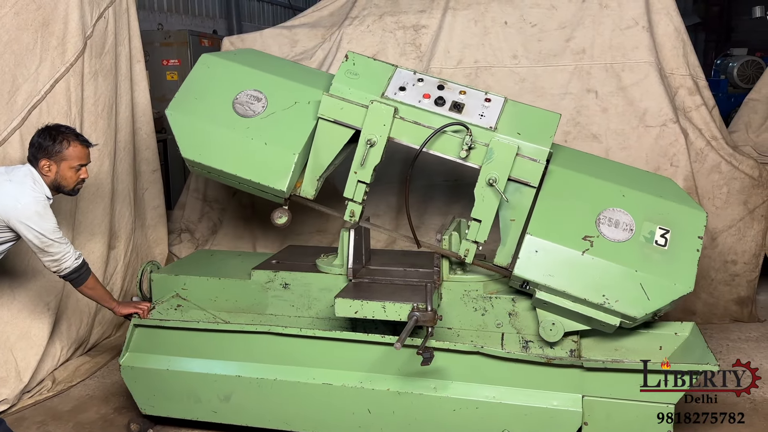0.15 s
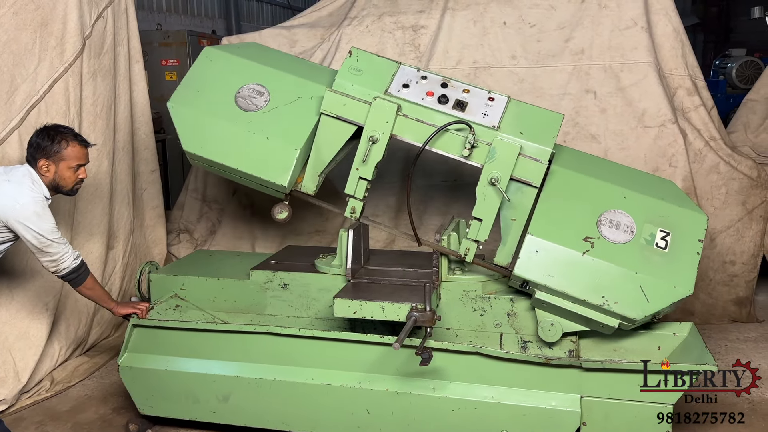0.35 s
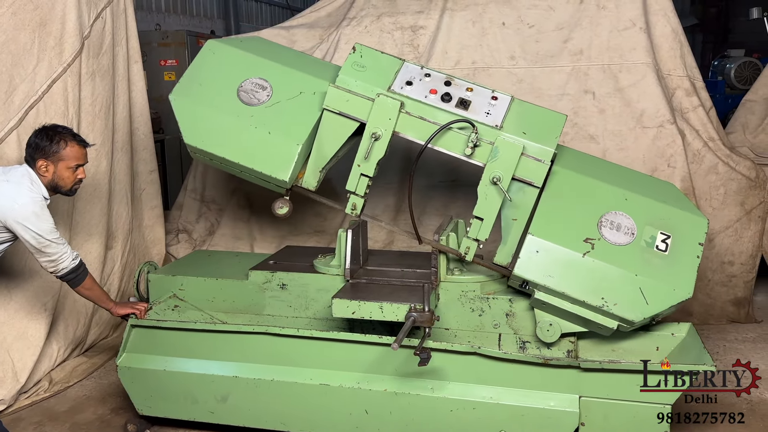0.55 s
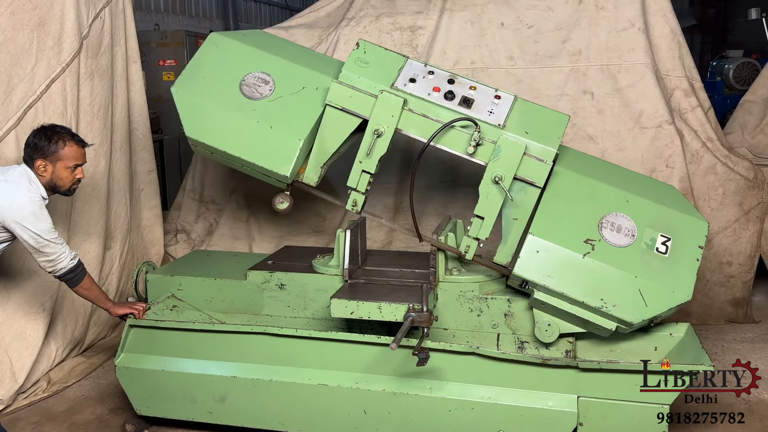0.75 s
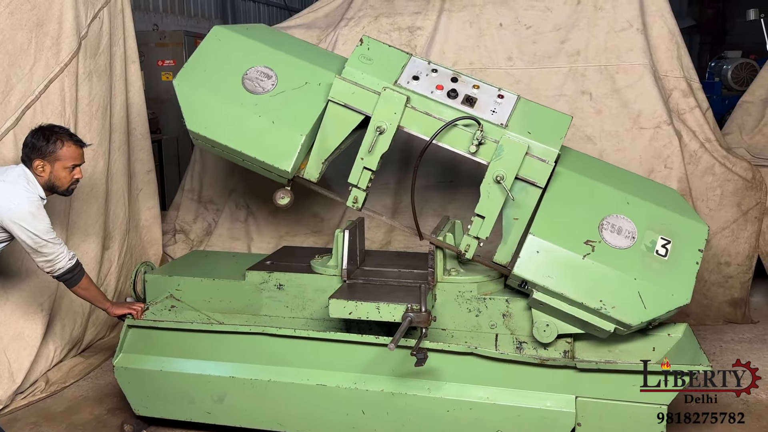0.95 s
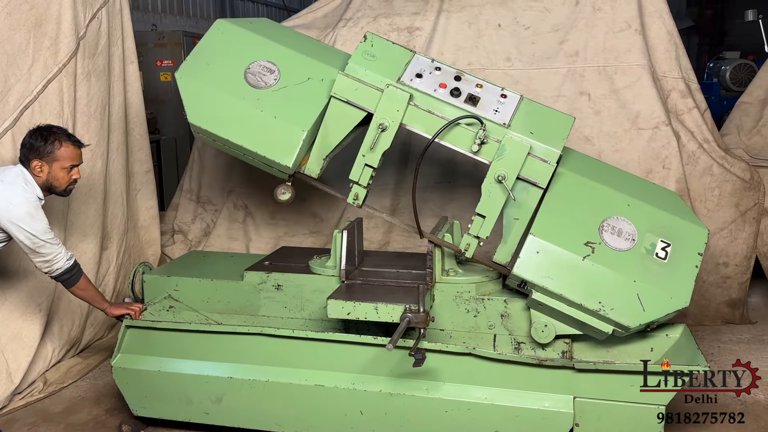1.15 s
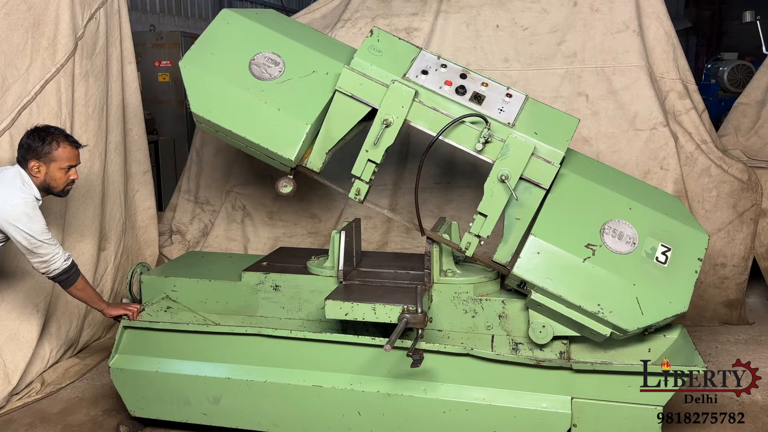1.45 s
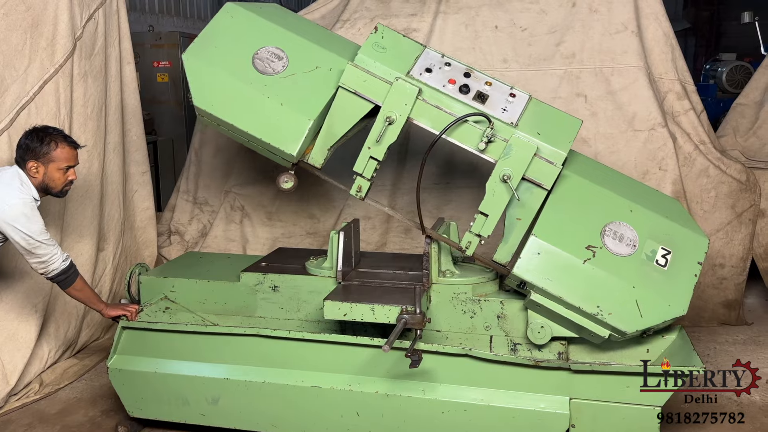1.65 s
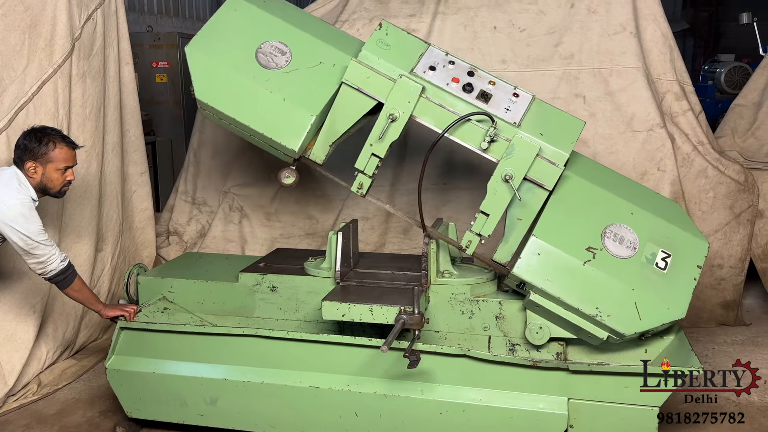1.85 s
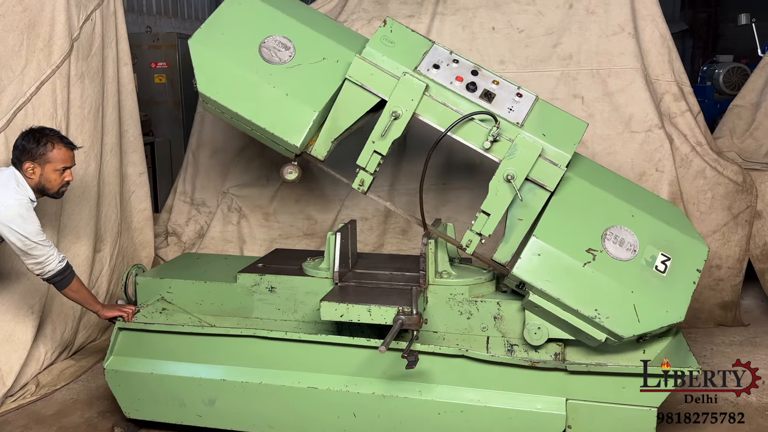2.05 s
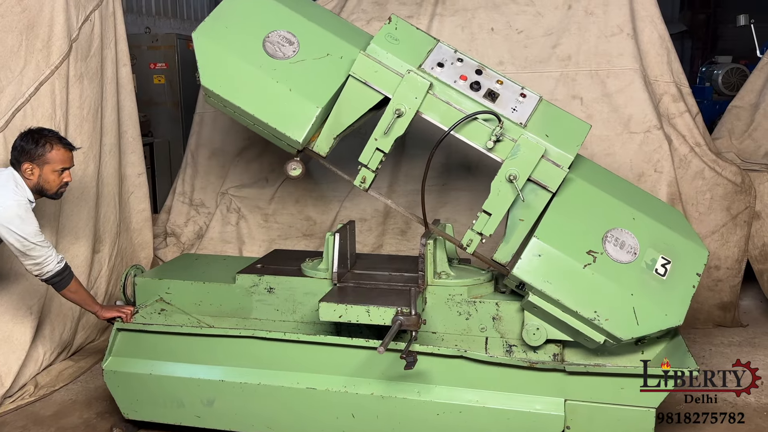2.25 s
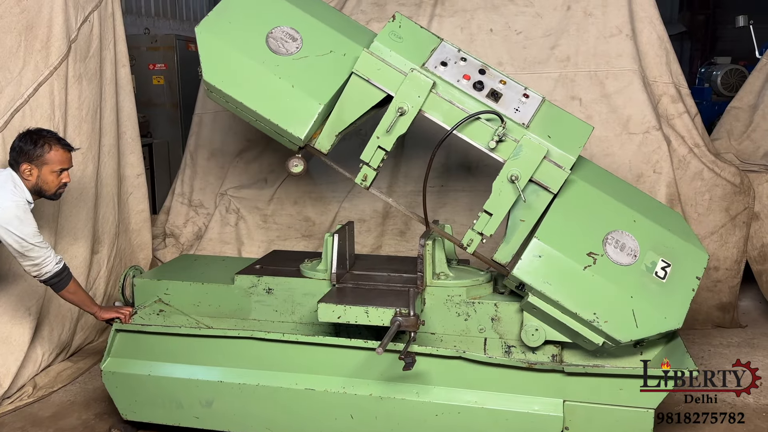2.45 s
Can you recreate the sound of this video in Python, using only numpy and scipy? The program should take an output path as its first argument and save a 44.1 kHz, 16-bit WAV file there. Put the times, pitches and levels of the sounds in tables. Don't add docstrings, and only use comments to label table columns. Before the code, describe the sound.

Steady low machine hum with slight wavering and airy hiss, heard in mono from nearby; after over two seconds a loud metallic switch clack and short thud, a reverberant slap, and the motor coasts down.

```python
import sys
import numpy as np
from scipy import signal
from scipy.fft import rfft, irfft
from scipy.io import wavfile
from scipy.ndimage import uniform_filter1d

SR = 44100
rng = np.random.default_rng(int(sys.argv[2]) if len(sys.argv) > 2 else 0)


def volts_from_db(level):
    exponent = np.asarray(level, float) / 20
    return 10 ** exponent


def output_pcm(signal):
    pcm = np.clip(np.atleast_2d(signal).T, -1, 1) * 32767
    wavfile.write(sys.argv[1], SR, np.round(pcm).astype(np.int16))


N = 114660
CUT_S = 2.297
CLACK_S, CLACK_DB = 2.286, -2


def evened(x):
    return x / np.sqrt(np.mean(x ** 2) + 1e-20)


def read(points, hz):
    f, value = np.transpose(points)
    return np.interp(np.log(hz + 1), np.log(f + 1), value)


def coloured(count, table, tilt_db=0):
    hz = np.fft.rfftfreq(count, 1 / SR)
    gain = volts_from_db(read(table, hz) + tilt_db * np.log2((hz + 50) / 2000))
    return evened(irfft(rfft(rng.standard_normal(count)) * gain, count))


def resonate(x, hz, width):
    turn = np.exp(2j * np.pi * np.cumsum(hz * np.ones(len(x))) / SR)
    r = np.exp(-np.pi * width / SR)
    return 2 * (turn * signal.lfilter([1 - r], [1, -r], x / turn + 1e-18)).real


def whistle(hz, width):
    once = resonate(rng.standard_normal(N), hz, width)
    return evened(resonate(once, hz, width))


def after_cut():
    return np.maximum(np.arange(N) / SR - CUT_S, 0)


# frequency in Hz, level in dB per Hz.
HISS = [(160, -47), (280, -5), (658, -7), (757, -7), (871, -7), (2840, -19), (4250, -30.5), (9400, -38.5),
        (10800, -48), (11400, -83.5), (12000, -64.5), (15000, -79), (22000, -120)]


def hiss():
    hiss_db, patch_db, swell_db = -51.5, 1, 0.25
    frames, hz = N // 512 + 6, np.fft.rfftfreq(2048, 1 / SR)
    a, b, patches = rng.standard_normal((frames, 1025, 3)).T
    patches = uniform_filter1d(patches, size=20, axis=0)
    patches = evened(uniform_filter1d(patches, size=6, axis=1))
    swell = evened(uniform_filter1d(rng.standard_normal(frames), size=8))
    z = (a + 1j * b) * volts_from_db(read(HISS, hz)[:, None] + patch_db * patches + swell_db * swell)
    noise = signal.istft(z, nperseg=2048, noverlap=1536)[1][1024:1024 + N]
    return volts_from_db(hiss_db) * evened(noise)


# frequency in Hz, width in Hz, level in dB.
CASING = [(363, 77, -59), (773.4, 12, -63.5), (973, 89, -65), (1134, 13, -66.5), (1707, 22, -70),
          (2320, 35, -80), (2720, 40, -78.5), (2865, 250, -69), (3370, 580, -75), (5450, 940, -78),
          (9530, 930, -88), (14600, 250, -99)]
# frequency in Hz, level in dB per Hz.
RUMBLE = [(20, -36.5), (30, -19.5), (40, -9), (50, -10.5), (70, 0), (120, 0.5), (220, -1.5), (320, -11.5),
          (900, -120)]


def pump():
    casing = sum(volts_from_db(db) * whistle(f, w) for f, w, db in CASING)
    rumble = volts_from_db(-47) * coloured(N, RUMBLE)
    return (hiss() + casing + rumble) * volts_from_db(3 * after_cut())


# frequency in Hz, t60 in seconds.
HALL = [(200, 1), (1000, 0.68), (2500, 1), (6000, 1), (10000, 0.71), (15500, .4)]


def tail(share):
    ring_db, ring_width_hz, rise_s = -2, 120, 0.021
    wash = coloured(SR, CRACK)
    wash = wash + sum(volts_from_db(ring_db + d) * resonate(wash, f, ring_width_hz) for f, d, t60 in BOX)
    hz, t, z = signal.stft(wash, SR, nperseg=256)
    decay = volts_from_db(-60 * t / (share * read(HALL, hz)[:, None]))
    h = signal.istft(z * decay, SR, nperseg=256)[1][:SR]
    h = h * np.minimum(np.arange(SR) / (rise_s * SR), 1)
    return h / np.linalg.norm(h)


def far_wall():
    delay_s, rise_s, slap_db, slap_t60 = 0.2015, 0.01, -42.5, 0.09
    tail_db, tail_t60 = -6.5, 0.5
    t = np.maximum(np.arange(SR) / SR - delay_s, 0)
    bright = coloured(SR, CRACK, 8.5) * volts_from_db(-60 * t / slap_t60)
    dull = coloured(SR, CRACK, 0.79) * volts_from_db(tail_db - 60 * t / tail_t60)
    return volts_from_db(slap_db) * (bright + dull) * np.minimum(t / rise_s, 1)


def hall():
    near = volts_from_db(CLACK_DB - 0.5) * tail(0.2)
    far = volts_from_db(CLACK_DB - 2) * tail(0.97)
    echo = far_wall() + near + far
    return np.r_[np.zeros(round(CLACK_S * SR)), echo][:N]


def thud():
    start_s, hz, db, rise_s, t60 = 2.287, 339, -33, 0.0032, 0.095
    t = np.maximum(np.arange(N) / SR - start_s, 0)
    return volts_from_db(db - 60 * t / t60) * np.minimum(t / rise_s, 1) * np.sin(2 * np.pi * hz * t)


HIT_S = [2.2755, 2.2845, 2.2862, 2.2905, 2.177, .82, .945, .865, 1.045, 2.2785, 2.2965, 2.3836, 2.4564,
         2.4958, 2.507, 2.413]
# level in dB, brightness (0 is dull, 1 is bright, above 1 brighter still).
HITS = [(-44.5, 0), (-27.5, 0.9), (-24.5, 0.68), (-24, 0.31), (-57.5, .45), (-67, .9), (-68, .95),
        (-68, .9), (-71, .95), (-53.5, 1.18), (-28.5, .25), (-53, .3), (-54, .2), (-55, 0.4), (-46.5, 0.4),
        (-59, .7)]
# frequency in Hz, level in dB per Hz.
CRACK = [(200, -26), (400, -16.5), (800, -8.5), (1100, -2.5), (1950, -3), (2600, -7), (5500, -14.5),
         (6500, -19), (9500, -18.5), (11200, -33.5), (15200, -35), (16000, -39), (16400, -100)]
# frequency in Hz, level in dB, t60 in seconds.
BOX = [(1028.4, -4.5, 0.05), (1132, -9.5, .05), (1488, 2, 0.07), (1810, -4.5, 0.035), (1906, -0.5, 0.023),
       (2125, -4, 0.032), (3090, -7.5, 0.03), (3470, -6.5, 0.024), (3805, -2.5, 0.028), (4500, -9, 0.019),
       (4840, -10.5, 0.034), (5403, -1, .02), (5670, -2, 0.018), (9460, -6, 0.017)]


def contactor():
    crack_db, crack_t60, longest_ring_s, rise_s = 4.5, 0.029, 0.045, 0.0012
    t, out = np.arange(SR // 4) / SR, np.zeros(N + SR)
    for s, (db, bright) in zip(HIT_S, HITS):
        tilt_db = 8 * (bright - 0.5)
        crack = coloured(len(t), CRACK, tilt_db) * volts_from_db(crack_db - 60 * t / crack_t60)
        ring = np.zeros(len(t))
        for f, d, t60 in BOX:
            fade_db = d - 60 * t / min(t60, longest_ring_s) + tilt_db * np.log2(f / 2000)
            ring += volts_from_db(fade_db) * np.sin(2 * np.pi * (f * t + rng.random()))
        out[round(s * SR):][:len(t)] += volts_from_db(db) * np.minimum(t / rise_s, 1) * (crack + ring)
    return out[:N]


PASS_S = [2.315, 2.33, 2.375, 2.4, 2.43, 2.52, 2.55, 2.58, 2.44, 2.455, 2.335, 2.5]
# frequency in Hz, rms level in dB, half length in seconds.
ROOM_NOTES = [(302, -37, 0.024), (249, -47, 0.037), (122.4, -35.5, 0.038), (213.6, -44.5, 0.049),
              (135, -41.5, 0.067), (75, -43, 0.064), (157.7, -45.5, .05), (225, -49, 0.0299),
              (228, -44, 0.033), (93.3, -36, 0.018), (224.5, -48, 0.017), (165.5, -46, 0.052)]


def coasting():
    t, out = np.arange(N) / SR, np.zeros(N)
    for s, (hz, db, half) in zip(PASS_S, ROOM_NOTES):
        swell = np.exp(-((t - s) / half) ** 2)
        out += volts_from_db(db) * swell * np.sqrt(2) * np.sin(2 * np.pi * (hz * t + rng.random()))
    return out


def order(hz, width):
    steady_share = 0.5
    tone = np.sqrt(2) * np.sin(2 * np.pi * (np.cumsum(hz) / SR + rng.random()))
    return np.sqrt(steady_share) * tone + np.sqrt(1 - steady_share) * whistle(hz, width)


# time in seconds, boom frequency in Hz, boom level in dB.
MOTOR = [
    (0.0, 99.8, -33.5),
    (0.08, 100, -29),
    (0.14, 101.4, -31.5),
    (0.75, 101.4, -30),
    (0.88, 100.7, -32),
    (1.26, 101.7, -30.5),
    (1.94, 101.8, -29.5),
    (2.281, 101.5, -29),
]
# multiple of shaft rate, level in dB, waver width in Hz.
ORDERS_WAVERING = [(3, -51, 4.7), (1.5, -65, 3), (2.5, -57, 6), (4.5, -55, 5.9), (5, -47, 8.9),
                   (5.5, -53, 6), (6.2, -50, 9), (7, -62.5, 2), (8, -60, 3.5), (8.85, -56.5, 15),
                   (10, -59.5, 14)]


def motor():
    boom_order, sag_per_s = 4, 0.02
    fuzz_db, fuzz_hz = -23.5, 14
    hum_fade, order_fade = 65, 72
    stop_s, stop_fade = 2.42, 303
    t, late = np.arange(N) / SR, after_cut()
    s, hz, db = np.transpose(MOTOR)
    boom_hz = np.interp(t, s, hz) * (1 - sag_per_s * late)
    load_db = np.interp(t, s, db)
    boom = -np.sqrt(2) * np.cos(2 * np.pi * np.cumsum(boom_hz) / SR)
    boom = boom + volts_from_db(fuzz_db) * whistle(boom_hz, fuzz_hz)
    boom_db = load_db - hum_fade * late - stop_fade * np.maximum(t - stop_s, 0)
    rest = sum(volts_from_db(d) * order(k * boom_hz / boom_order, w) for k, d, w in ORDERS_WAVERING)
    rest_db = load_db - db.mean() - order_fade * late
    return boom * volts_from_db(boom_db) + rest * volts_from_db(rest_db)


def scene():
    return (pump() + hall() + thud() + contactor() + coasting() + motor())[None]


def top_cut(x):
    return signal.sosfilt(signal.butter(12, 16190, fs=SR, output="sos"), x)


def record(dry):
    knee = 0.42
    mix = knee * np.tanh(dry / knee)
    return top_cut(mix)


dry = scene()
out = record(dry)
output_pcm(out)
```